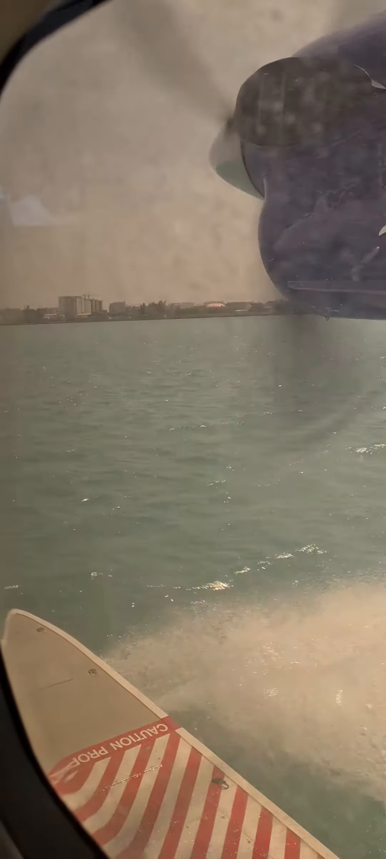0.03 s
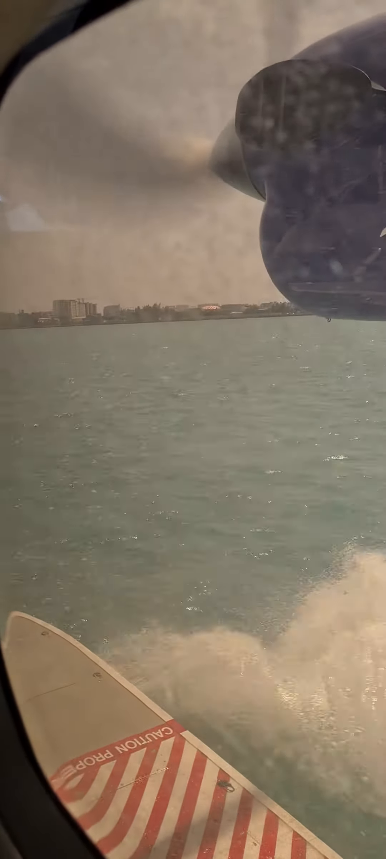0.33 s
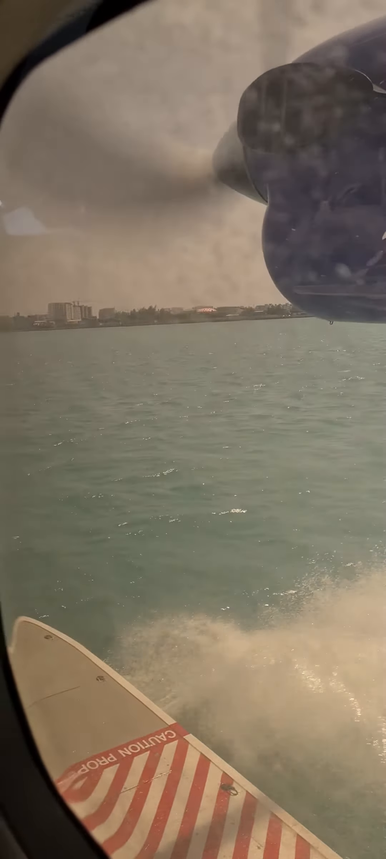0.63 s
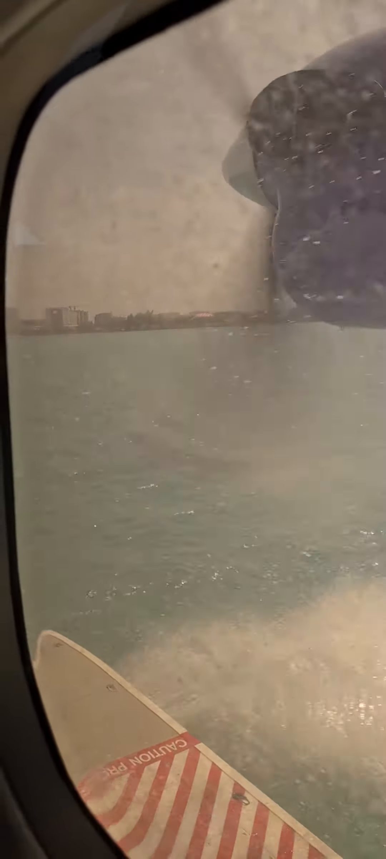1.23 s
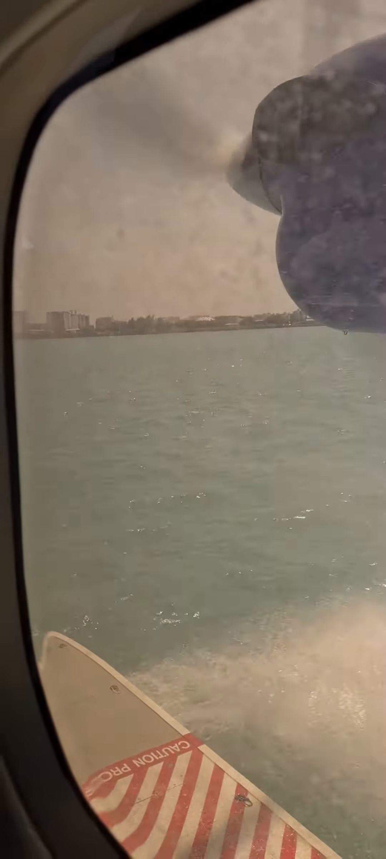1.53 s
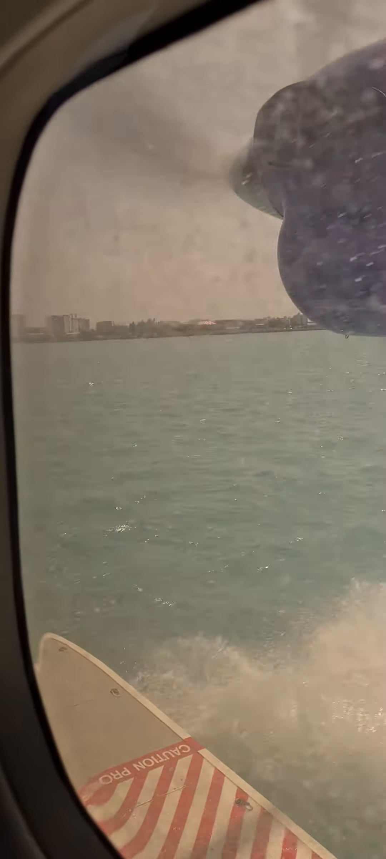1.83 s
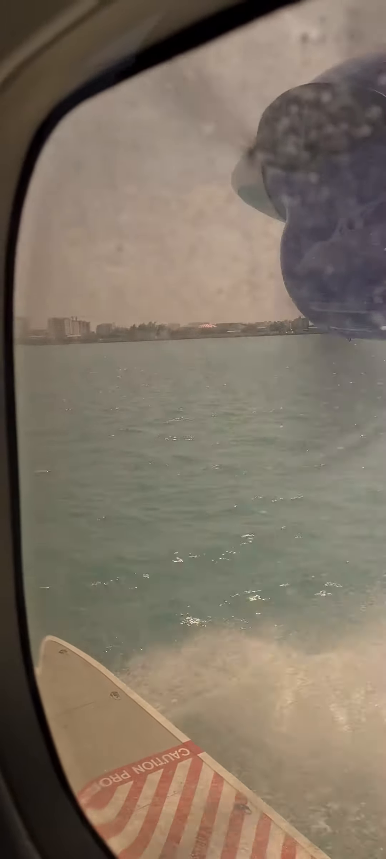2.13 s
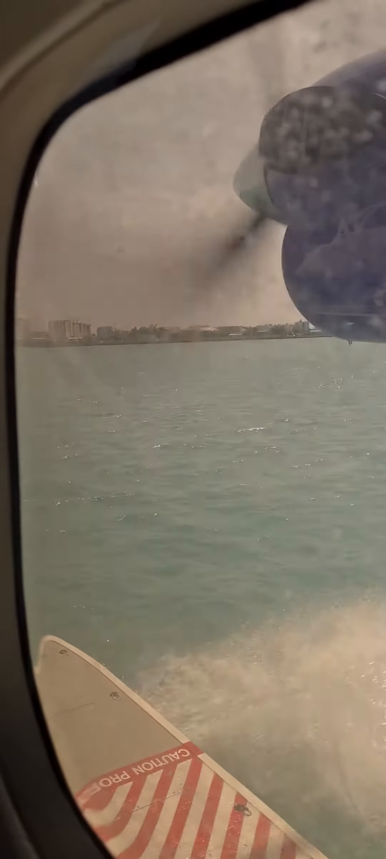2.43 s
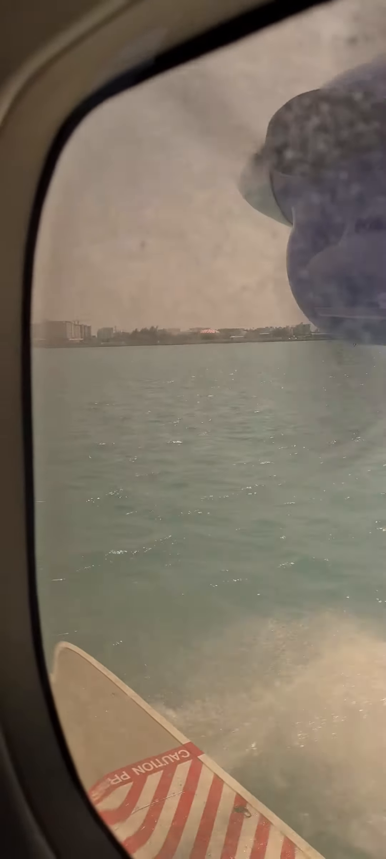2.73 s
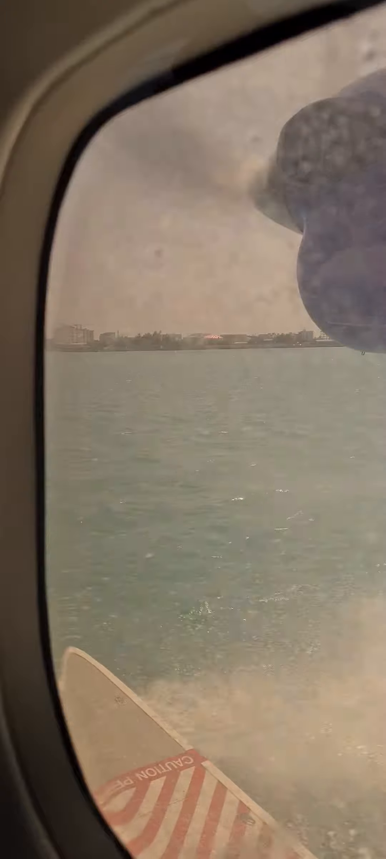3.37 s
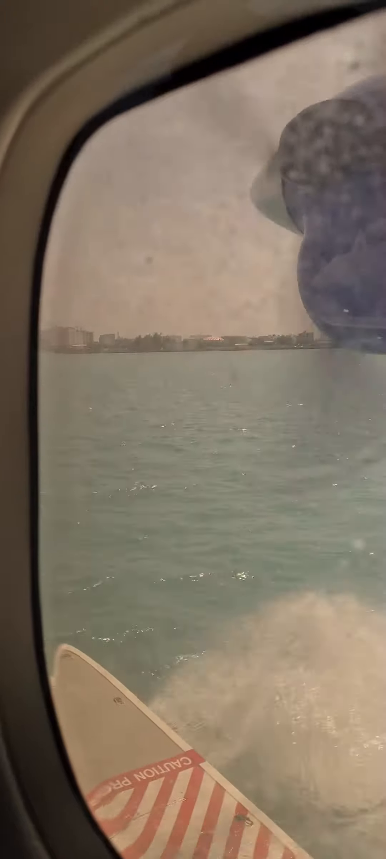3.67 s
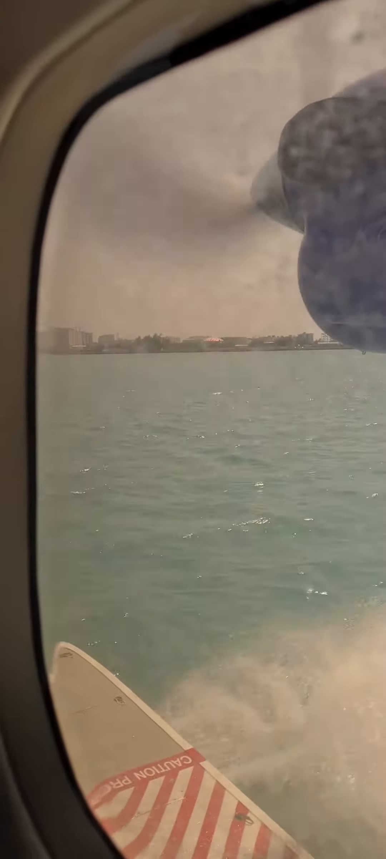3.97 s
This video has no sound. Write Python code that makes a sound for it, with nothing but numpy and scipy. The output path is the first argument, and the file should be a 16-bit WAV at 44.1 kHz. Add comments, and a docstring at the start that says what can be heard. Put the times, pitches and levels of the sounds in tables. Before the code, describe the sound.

Two propellers drone loudly inside a seaplane on its take-off run, creeping up in pitch with a throbbing beat. The hull rumbles underneath, while air and spray hiss at the window.

```python
"""Two three-bladed propellers drone inside a seaplane on its take-off run. They speed up unevenly and the
slower one gains on the faster, so the beat between them slows and deepens. The faster one's shaft shakes
the cabin, and the slower one rasps once per blade, in surges. Underneath, the hull rumbles; on top sit a
faint turbine whistle and the hiss of air and spray at the window, fluttering with the blades."""
import sys
import numpy as np
from scipy import signal
from scipy.fft import rfft, irfft, next_fast_len
from scipy.io import wavfile
from scipy.ndimage import map_coordinates

SR = 44100
rng = np.random.default_rng(int(sys.argv[2]) if len(sys.argv) > 2 else 0)


def file_out(sig):
    """Save sig as 16-bit WAV at sys.argv[1]."""
    # one column per channel
    cols = np.atleast_2d(sig).T
    # limit, then scale
    lim = np.clip(cols, -1, 1)
    pcm = np.round(lim * 32767).astype(np.int16)
    wavfile.write(sys.argv[1], SR, pcm)


N = 176400

# Blade-pass rates: t/s, fast propeller f/Hz, slow propeller f/Hz
BLADE_RATES = [(0.0, 101.55, 88.39), (0.75, 101.02, 90.46), (1.3, 102.95, 91.8), (1.85, 104.79, 93.69),
               (2.5, 105.57, 95.2), (3.1, 105.5, 95.66), (3.6, 105.75, 97.73), (4.0, 105.1, 99.29)]
# Faders of the two fundamentals: t/s, fast level/dB, slow level/dB
BLADE_LEVELS = [(0, -16.5, -31), (.45, -14.5, -32), (.9, -14, -40), (1.55, -14, -23.5), (2, -14, -19.5),
                (2.6, -16, -16), (3.4, -17.5, -13.5), (4, -21, -13.5)]
# Each drone's overtones: multiple of the blade rate, base level/dB, slope with rate/(dB/Hz), left-right/dB
FAST_OVERTONES = [(2, -20.5, -0.93, -5.5), (3, -24.5, 1.0, 2), (4, -33, -1.05, 1), (5, -37.5, -0.2, -6),
                  (6, -46, 0, -16), (7, -51, 1, 0), (8, -51.5, 0, 17), (9, -55, 1.5, 0), (10, -56.5, 1, 2)]
SLOW_OVERTONES = [(2, -26, 0.32, -6), (3, -30, 0.43, -9), (4, -35, 0.37, -7), (5, -40, -0.7, -4),
                  (6, -38.5, -0.69, 3), (7, -46.5, -0.92, -6.5), (8, -42, -0.42, 2), (9, -47, -0.66, 7.5),
                  (10, -52, -0.13, -1), (11, -51.5, -0.54, 1), (12, -53.5, -.8, 0), (13, -58, -1.1, -2),
                  (14, -55.5, -0.59, -2)]
# Gain ride on the low overtones: t/s, gain/dB
LOW_OVERTONE_RIDE = [(0, -.5), (.7, -.7), (1.3, 1.3), (2.1, .5), (3, .3), (3.5, 0), (4, 0)]
# Sum tones of the panels: multiple of the fast rate, multiple of the slow rate, level/dB
PANEL_TONES = [(1, 1, -40), (2, 1, -41), (1, 2, -43)]
# Rasp fader, ahead of surges and trim: t/s, level/dB
RASP_FADER = [(0, -33.5), (.3, -31.5), (.7, -31), (1.2, -30.5), (1.6, -32), (2.1, -31.5), (2.7, -32),
              (3, -34.5), (3.3, -34), (3.6, -37), (4, -36.5)]
# Rasp colour: f/Hz, relative level/dB
RASP_EQ = [(150, -30), (350, -3), (550, 1.5), (780, 0), (1000, -4.5), (1300, -5.5), (1620, -16),
           (1711, -10), (1800, -19.5), (2200, -19.5), (4000, -36.5), (9000, -72)]
# Surges of the rasp: t/s, rise/dB
RASP_SURGES = [(.145, 6), (.285, 7), (.36, 3.5), (.46, 7), (.56, 3), (.625, 9.5), (.725, 5.5), (.945, 4.5),
               (1.1, 6.5), (1.215, 5), (1.4, 2), (1.53, 2), (1.77, 2), (2.18, 2.5), (2.32, 2), (2.45, 2.5),
               (2.67, 4.5), (2.78, 2.5), (3.17, 4.5), (3.26, 5.5), (3.81, 2)]
# Rumble colour: f/Hz, relative level/dB
RUMBLE_EQ = [(10, -26), (28, -9), (50, -3.5), (72, 3), (100, -2.5), (140, -7), (210, -8), (300, -13),
             (450, -15), (700, -27.5), (1500, -51), (4000, -80)]
# Stereo image of rasp and rumble: f/Hz, left-right correlation
CORRELATION = [(25, .97), (70, 0.76), (200, 1), (450, 0.69), (750, 0.077), (1100, -0.5), (2000, 0.023),
               (4000, 0.47)]
# Pitch of the compressor's whistle: t/s, f/Hz
WHISTLE_PITCH = [(0, 9400), (.6, 9480), (1.5, 9680), (2.4, 9760), (4, 9850)]
# Hiss fader, ahead of trim: t/s, level/dB
HISS_FADER = [(0, -39.5), (.5, -39.5), (.8, -40.5), (1.1, -39.5), (1.42, -38.5), (1.65, -39.5), (1.85, -38),
              (1.92, -39.5), (2.1, -39.5), (2.52, -37.5), (2.75, -39.5), (2.9, -39.5), (3.12, -39),
              (3.4, -39.5), (3.8, -41), (4, -39)]
# Hiss colour on each side: f/Hz, relative level/dB
HISS_LEFT_EQ = [(500, -24), (2000, -1.5), (2500, -3.5), (3100, 0), (3800, -2), (4800, 0.5), (5250, 0),
                (6200, 0.5), (7600, 3), (8400, -4), (9200, 1), (13700, 0), (15500, -4)]
HISS_RIGHT_EQ = [(500, -11), (2000, -2.5), (2600, -3.5), (3100, -1.5), (3700, -2), (4700, 2.5),
                 (5200, -5.5), (6000, 0.5), (7600, -3.5), (8500, 3), (9000, 5.5), (9500, 4.5), (10400, 2.5),
                 (11700, 5.5), (13000, 1.5), (15500, 0.5)]

BLADES = 3
FAST_START_RAD, SLOW_START_RAD = -1.1, 1.4  # place in the blade cycle at 0 s
RASP_AT_RAD = -1.1  # where the rasp peaks in that cycle
GROWL_FROM, BUZZ_FROM = 4, 6  # multiples from which overtones jitter, and follow the rasp


def amp(db):
    """Decibels to gain."""
    return 10 ** (np.asarray(db) / 20)


def unit(x):
    """Scaled to rms 1."""
    return x / np.sqrt(np.mean(x ** 2) + 1e-20)


def along(points, hz):
    """Read a curve along a log frequency axis."""
    freqs, values = np.transpose(points)
    return np.interp(np.log(hz + 1), np.log(freqs + 1), values)


def curves(rows):
    """One automation curve for each column after the time."""
    times, *columns = np.transpose(rows)
    return [np.interp(np.arange(N) / SR, times, column) for column in columns]


def wobble(rate):
    """A smooth random modulator, rate knots a second."""
    at = np.arange(0, N + 64, 64)
    smooth = map_coordinates(rng.standard_normal(1024), [at * rate / SR + 2], mode="wrap")
    return np.interp(np.arange(N), at, smooth)


def filtered(x, response):
    """Equalise x with a gain given as a function of frequency."""
    size = next_fast_len(N + SR // 2)
    return irfft(rfft(x, size) * response(np.fft.rfftfreq(size, 1 / SR)), size)[..., :N]


def rush(eq):
    """Coloured stereo noise of rms 1, narrow in the bass and wide in the mids."""
    def mid_side_gains(hz):
        width = np.arccos(np.clip(along(CORRELATION, hz), -1, 1)) / 2
        return amp(along(eq, hz)) * [np.cos(width), np.sin(width)]
    mid, side = filtered(rng.standard_normal((2, N)), mid_side_gains)
    return unit(np.array([mid + side, mid - side]))


def angle(hz):
    """Running phase of a rate."""
    return 2 * np.pi * np.cumsum(hz) / SR


def tone(phase, db, waver, pan_db=0, lead_rad=0):
    """A stereo partial wavering in level and phase; positive pan and lead favour the left."""
    sides = np.array([[.5], [-.5]])
    level_db = db + pan_db * sides + .45 * waver * wobble(9)
    return np.sqrt(2) * amp(level_db) * np.cos(phase + lead_rad * sides + .07 * waver * wobble(14))


def propeller(rate, phase, blade_db, overtones, rasp_db, skew_rad, pan_db, lead_rad):
    """One lopsided suction pulse per blade; overtones swell or fade as they cross cabin resonances."""
    ride_db, = curves(LOW_OVERTONE_RIDE)
    buzz_db = .9 * (rasp_db - rasp_db.mean())
    drone = tone(phase + skew_rad, blade_db, .93, pan_db, lead_rad)
    for multiple, db, db_per_hz, side_db in overtones:
        k = round(multiple)
        buzzes = k >= BUZZ_FROM
        throb_db = .7 * wobble(6.9)
        resonance_db = db_per_hz * (rate - rate.mean())
        level_db = db + resonance_db + throb_db + (buzz_db if buzzes else ride_db)
        smear = .17 * k * rng.normal()  # the cabin smears the pulse, more so higher up
        growl = (k >= GROWL_FROM) * .35 * wobble(45)
        overtone_phase = k * (phase - buzzes * RASP_AT_RAD) + skew_rad + smear + growl
        drone += tone(overtone_phase, level_db, min(k, 4), side_db, lead_rad)
    return drone


def panels(fast_hz, slow_hz):
    """Panels driven hard by both propellers add tones at sums of their rates."""
    return sum(tone(angle(round(a) * fast_hz + round(b) * slow_hz), db, waver=4, pan_db=-2)
               for a, b, db in PANEL_TONES)


def shaft(fast_hz):
    """Slight imbalance in the fast propeller's shaft shakes the cabin once and twice a turn."""
    turn = angle(fast_hz) / BLADES
    return tone(turn, db=-35, waver=5) + tone(2 * turn, db=-31, waver=6)


def rasp(phase, rasp_db, trim_db=-.5, sharpness=.43):
    """Each blade of the slow propeller throws a burst of turbulence at the cabin wall."""
    bursts = np.exp(sharpness * np.cos(phase - RASP_AT_RAD) / 2)
    return amp(rasp_db + trim_db + .6 * wobble(25)) * unit(bursts * rush(RASP_EQ))


def surges(half_width_s=.023):
    """Quick swells of the rasp in dB, as if spray were thrown into the propeller."""
    t = np.arange(N) / SR
    return sum(db * np.exp(-.5 * ((t - at) / half_width_s) ** 2) for at, db in RASP_SURGES)


def rumble(level_db=-24, shudder_db=1.6):
    """The low bed: hull and cabin shudder as the floats run over the chop."""
    return amp(level_db + shudder_db * wobble(8)) * rush(RUMBLE_EQ)


def turbine(level_db=-54):
    """The compressor's faint, fuzzy whistle climbs as the engines spool up."""
    phase = angle(curves(WHISTLE_PITCH)[0])
    sides = [unit(wobble(160) * np.cos(phase) + wobble(160) * np.sin(phase)) for _ in range(2)]
    return amp(level_db) * np.array(sides)


def hiss(fast_phase, slow_phase, trim_db=5.5):
    """Air and spray at the window, pumped by the blades of both propellers and by their beat."""
    fader_db, = curves(HISS_FADER)
    white = rng.standard_normal((2, N))
    air = unit(filtered(white, lambda hz: amp([along(HISS_LEFT_EQ, hz), along(HISS_RIGHT_EQ, hz)])))
    pump = lambda phase: np.cos(phase + 2.1) + .49 * np.cos(2 * phase)
    beat = np.cos(fast_phase - slow_phase + .8)
    swell = np.exp(.12 * pump(fast_phase) + .07 * pump(slow_phase) + .099 * beat)
    flutter = unit(drops() * swell)
    return amp(fader_db + trim_db + .6 * wobble(45)) * flutter * air


def drops(per_second=70, decay_s=.0005, depth=.4):
    """Spray ticking on the hull: tiny spikes of random size in the gain of the hiss."""
    hits = (rng.random(N) < per_second / SR) * rng.exponential(size=N)
    return 1 + depth * signal.lfilter([1], [1, -np.exp(-1 / (decay_s * SR))], hits)


def scene():
    """The cabin mix: two beating drones, panel tones, the fast shaft and the noises of the run."""
    fast_hz, slow_hz = curves(BLADE_RATES)
    fast_db, slow_db = curves(BLADE_LEVELS)
    fast_phase = FAST_START_RAD + angle(fast_hz)
    slow_phase = SLOW_START_RAD + angle(slow_hz)
    rasp_db = curves(RASP_FADER)[0] + surges()
    fast_drone = propeller(fast_hz, fast_phase, fast_db, FAST_OVERTONES, rasp_db,
                           skew_rad=-2.3, pan_db=0, lead_rad=.53)
    slow_drone = propeller(slow_hz, slow_phase, slow_db, SLOW_OVERTONES, rasp_db,
                           skew_rad=2.4, pan_db=-3, lead_rad=.044)
    tones = fast_drone + slow_drone + panels(fast_hz, slow_hz) + shaft(fast_hz)
    return tones + rasp(slow_phase, rasp_db) + rumble() + turbine() + hiss(fast_phase, slow_phase)


def record(dry, ceiling=.95, top_hz=15750):
    """Soft-clip the highest peaks, then cut the extreme treble."""
    rounded = dry / (1 + np.abs(dry / ceiling) ** 8) ** (1 / 8)
    return filtered(rounded, lambda hz: hz < top_hz)


dry = scene()
out = record(dry)
file_out(out)
```